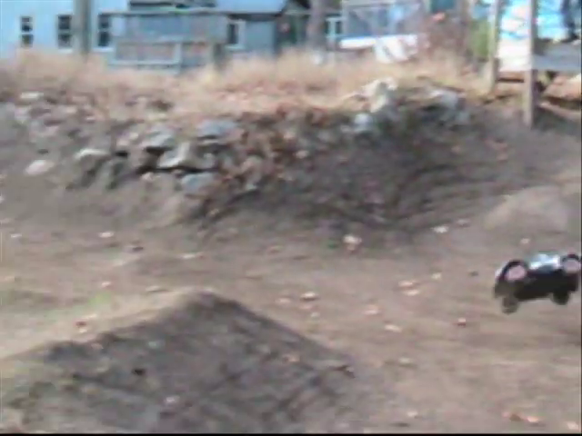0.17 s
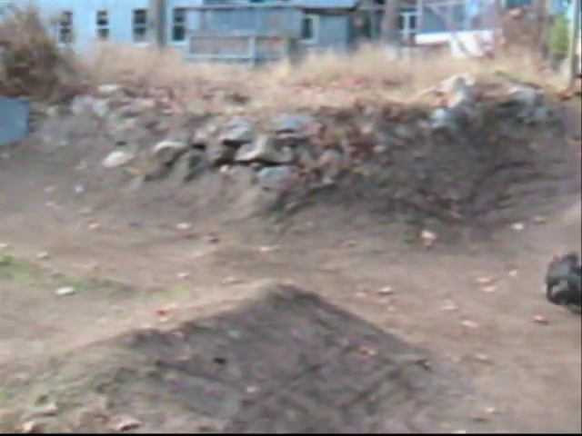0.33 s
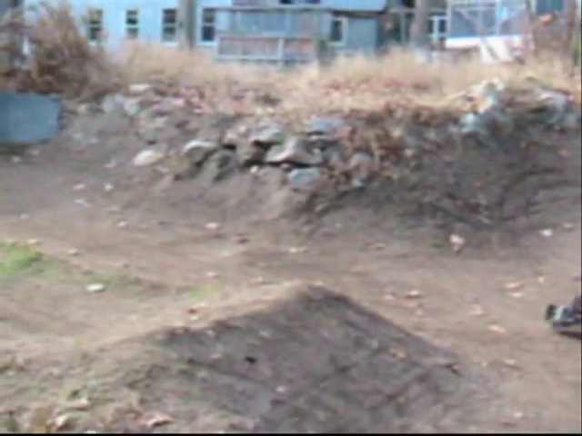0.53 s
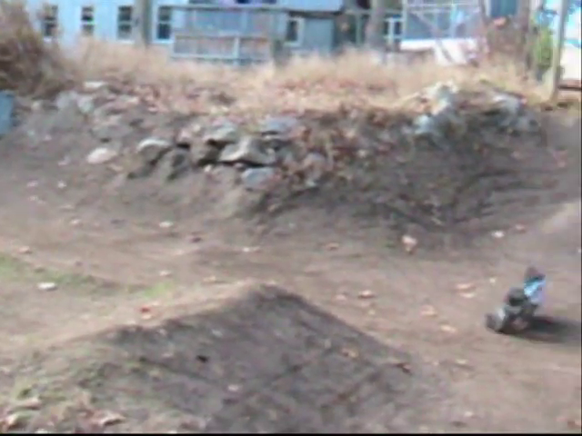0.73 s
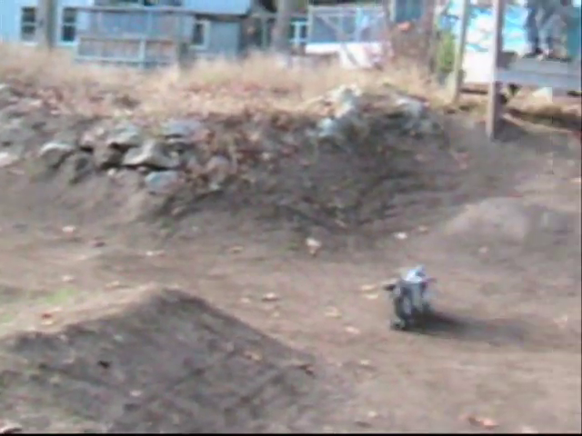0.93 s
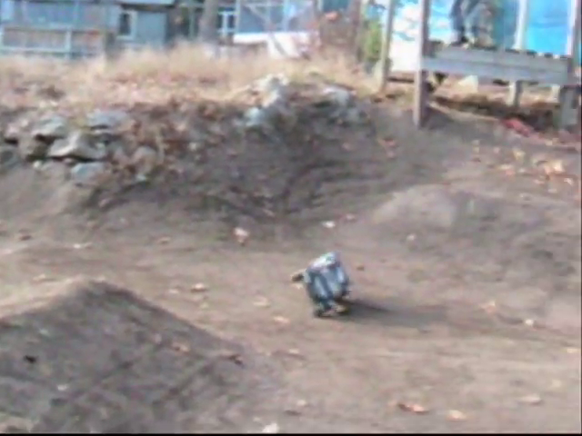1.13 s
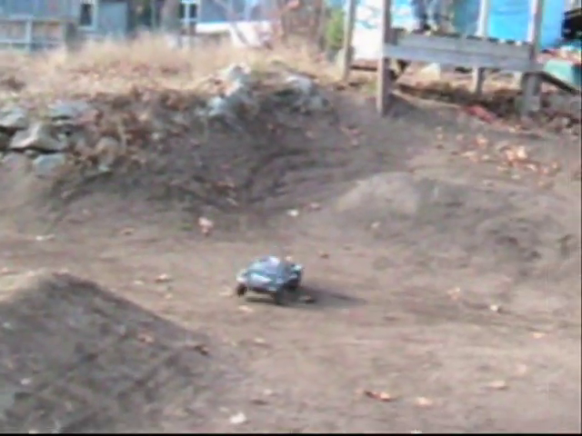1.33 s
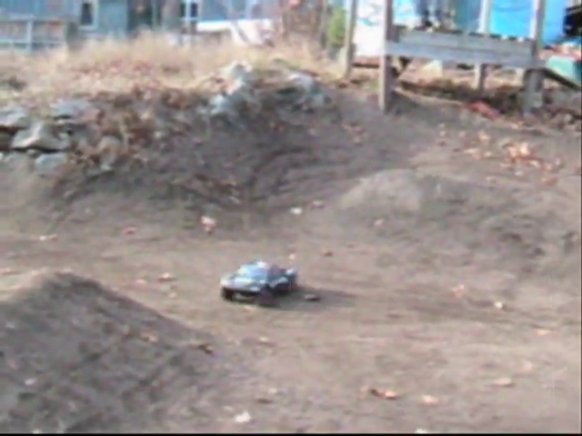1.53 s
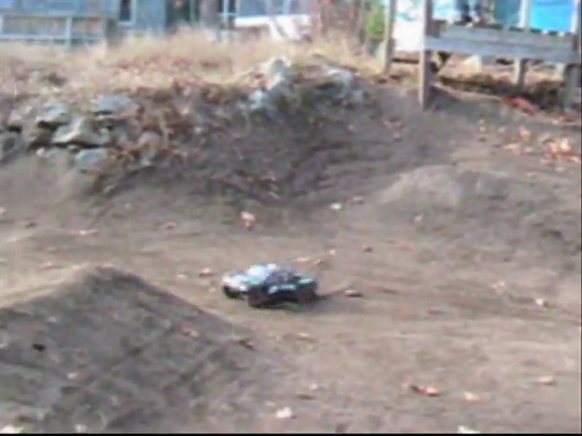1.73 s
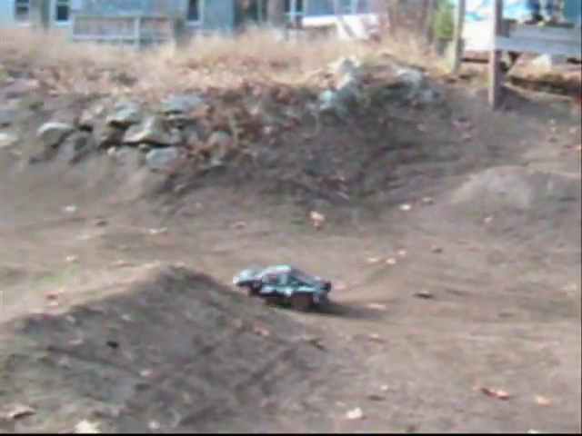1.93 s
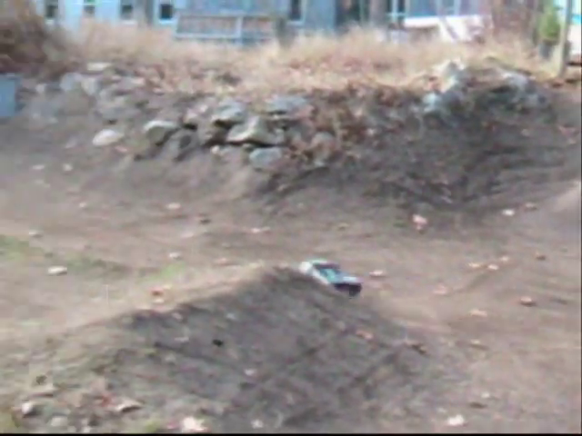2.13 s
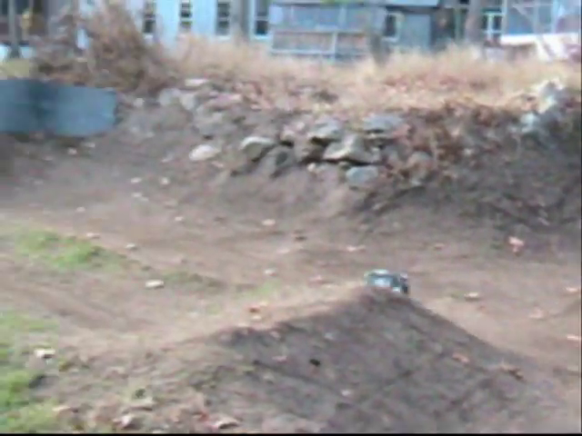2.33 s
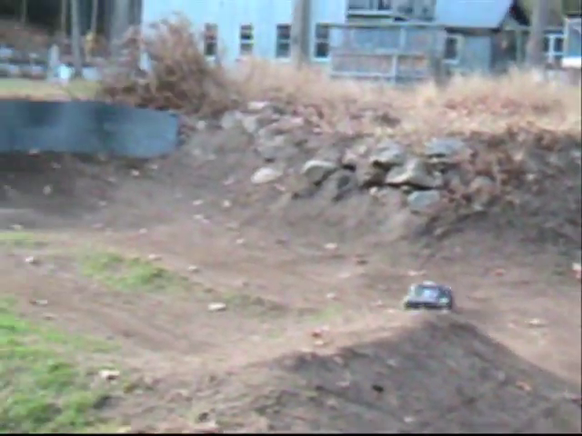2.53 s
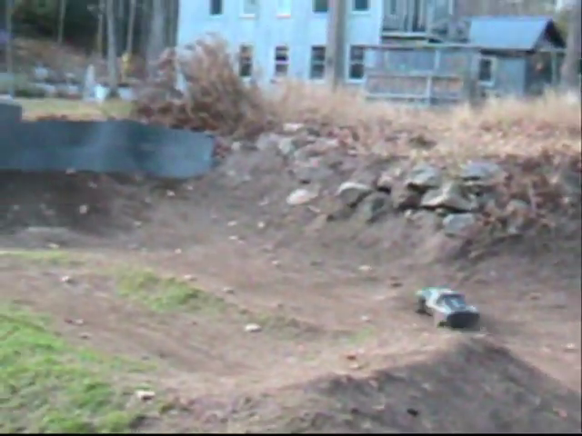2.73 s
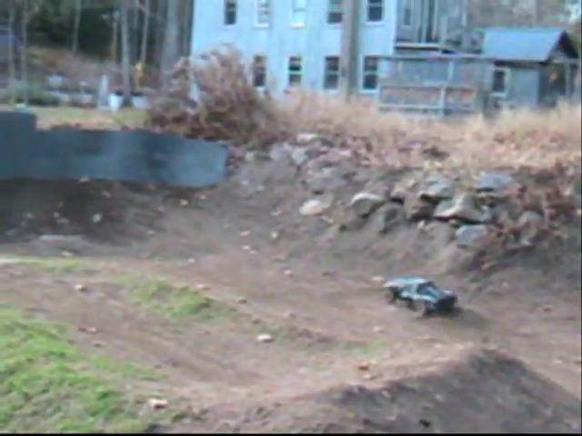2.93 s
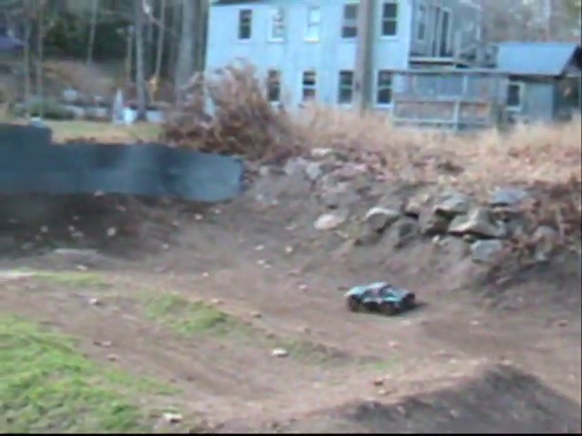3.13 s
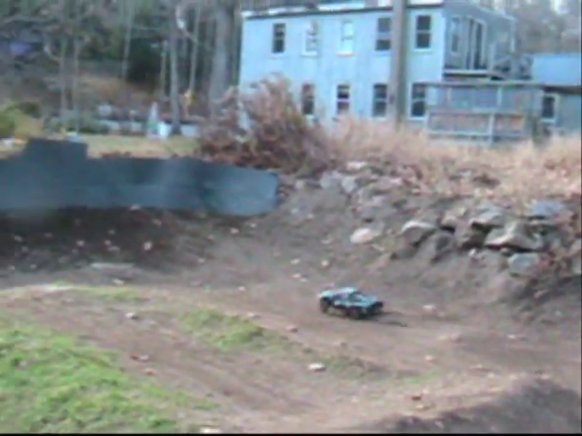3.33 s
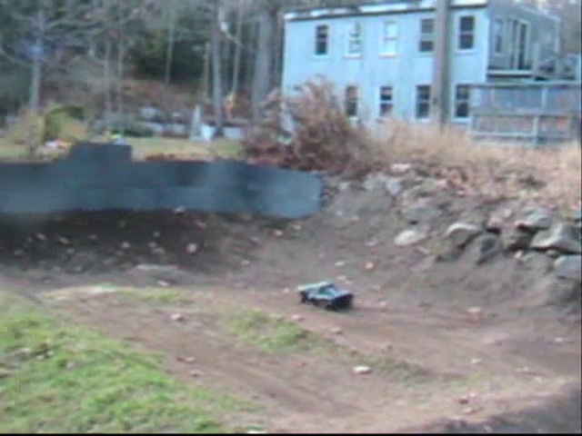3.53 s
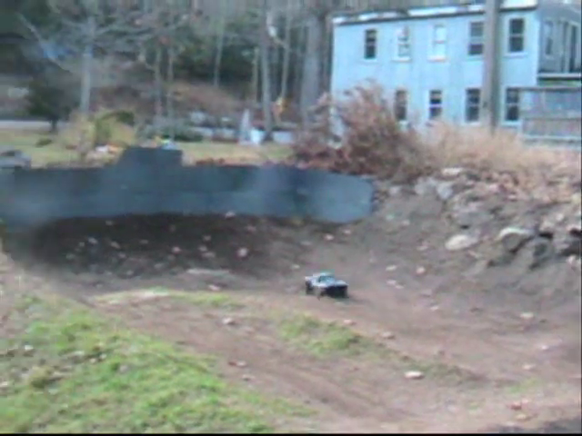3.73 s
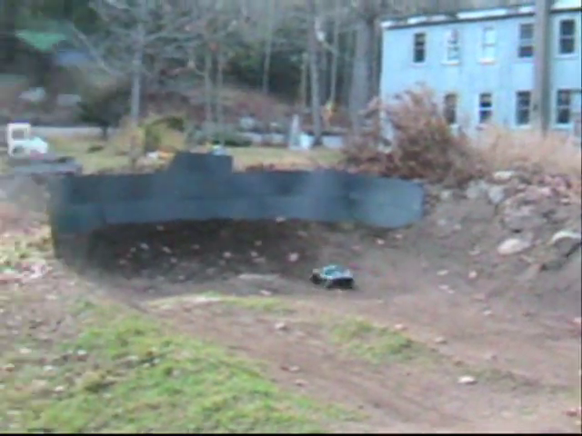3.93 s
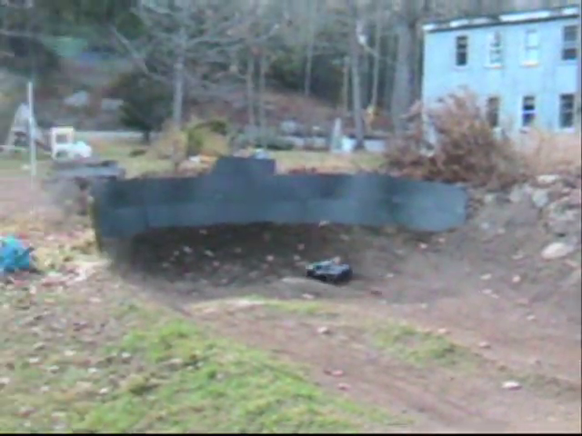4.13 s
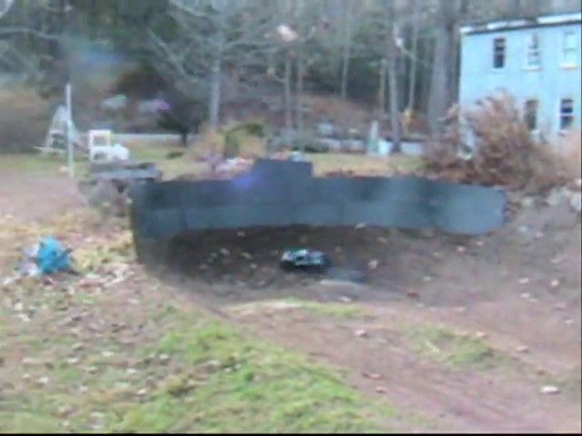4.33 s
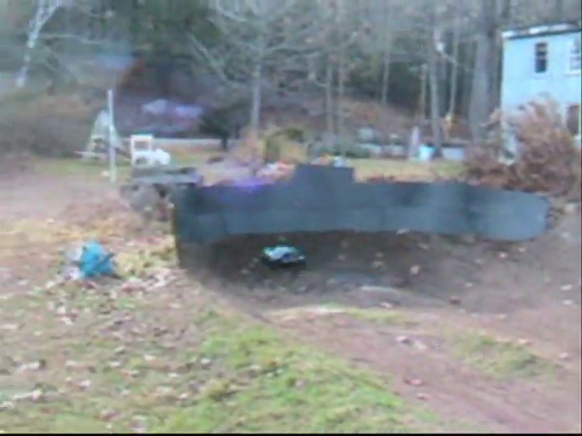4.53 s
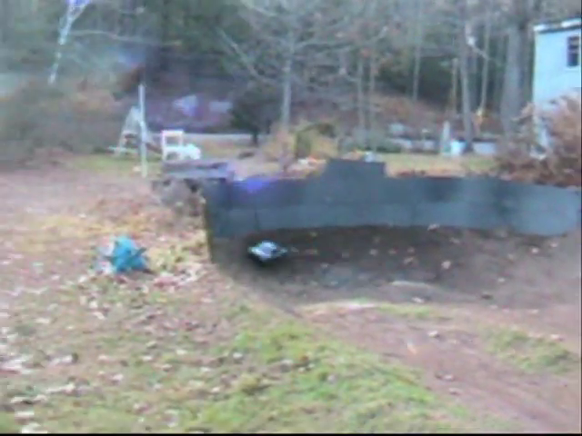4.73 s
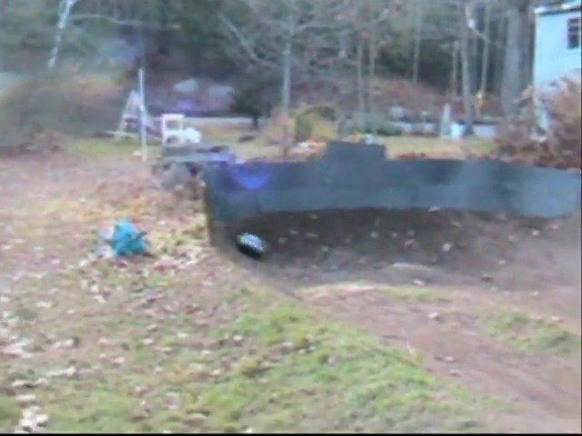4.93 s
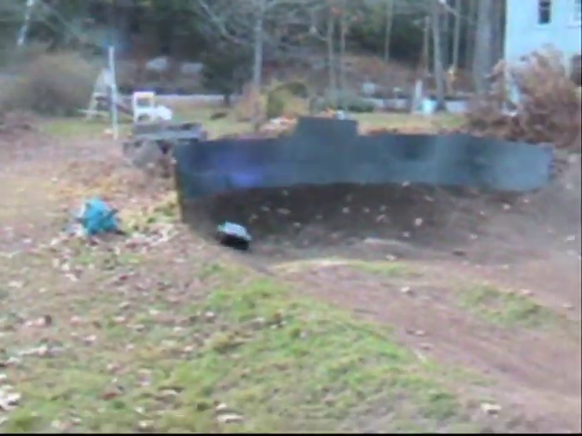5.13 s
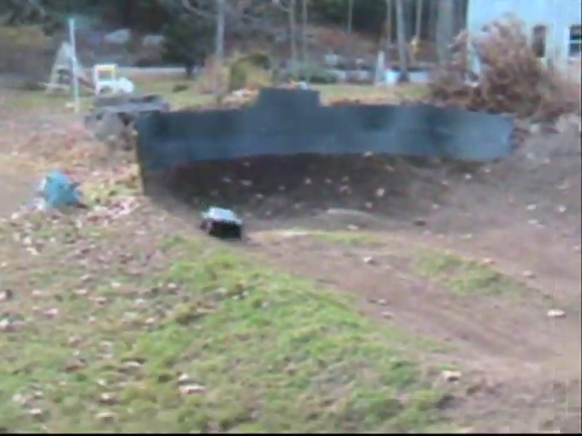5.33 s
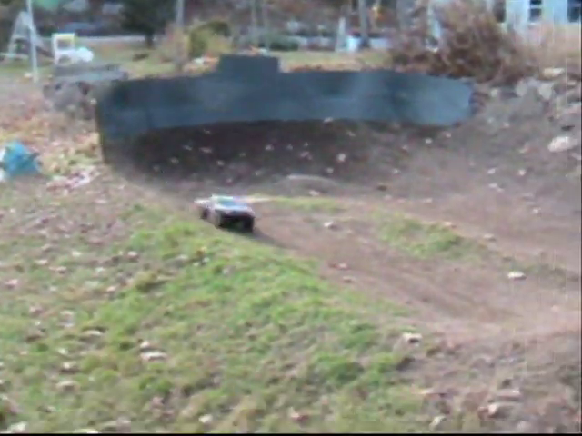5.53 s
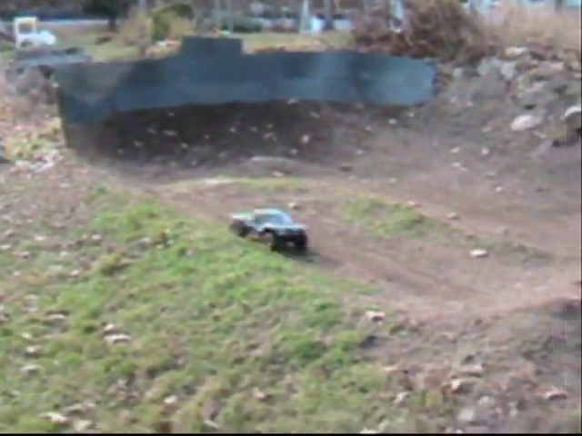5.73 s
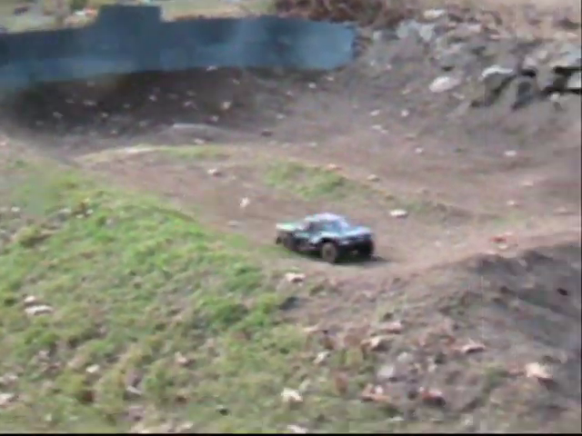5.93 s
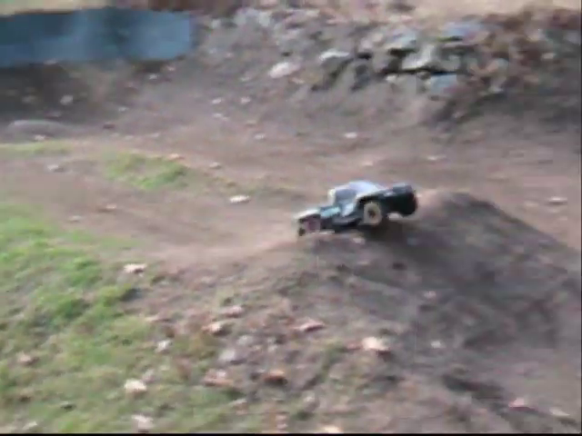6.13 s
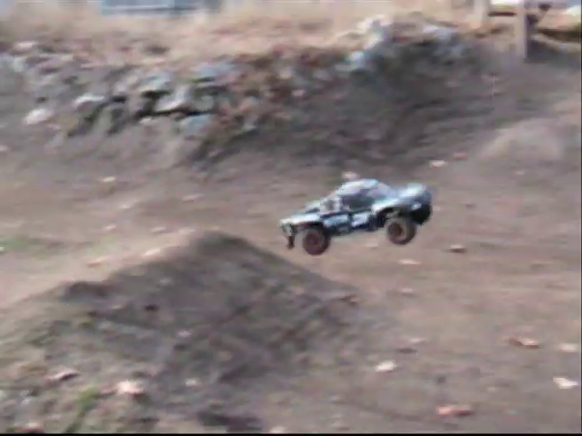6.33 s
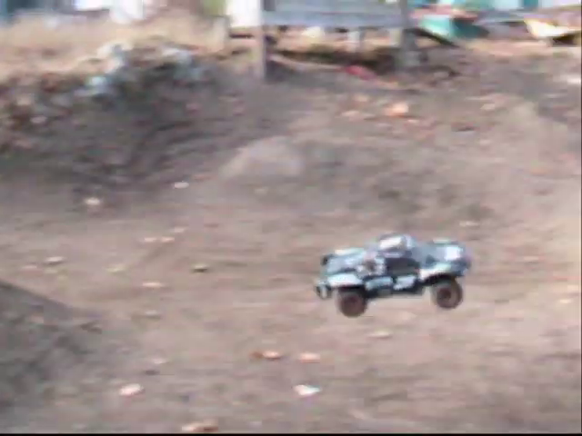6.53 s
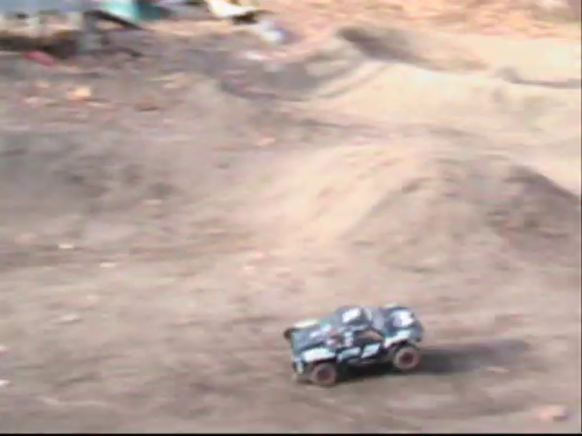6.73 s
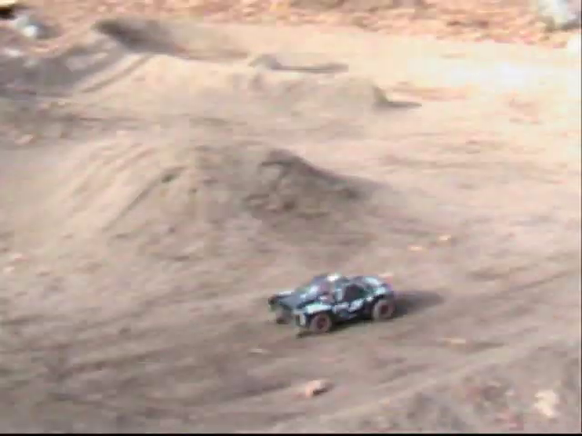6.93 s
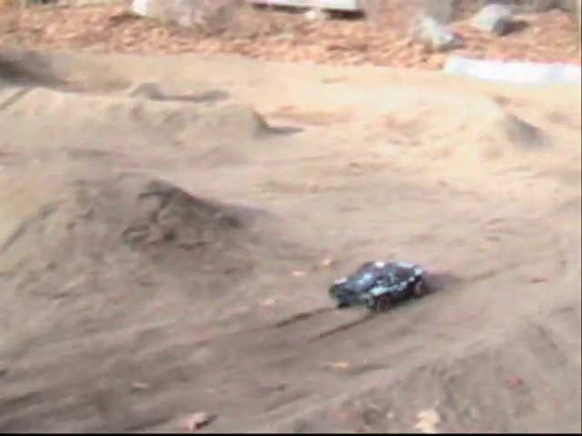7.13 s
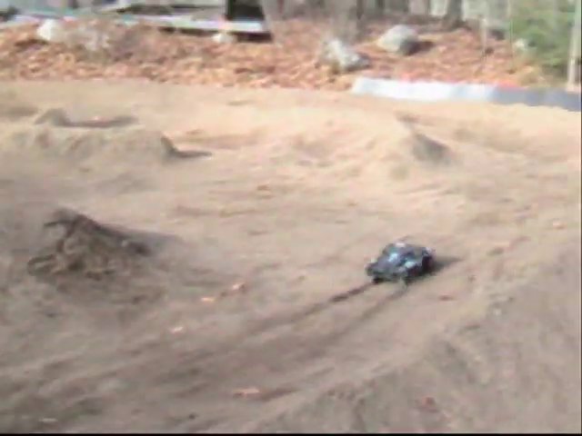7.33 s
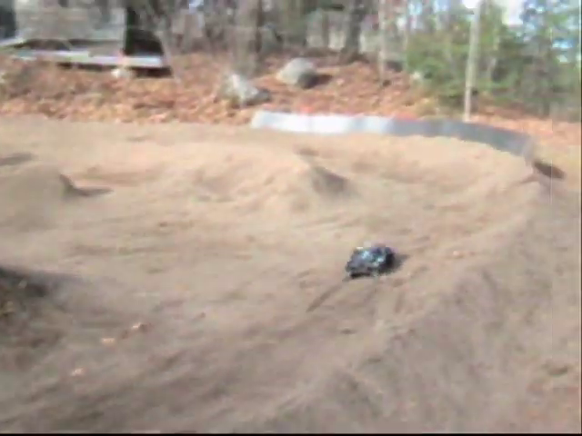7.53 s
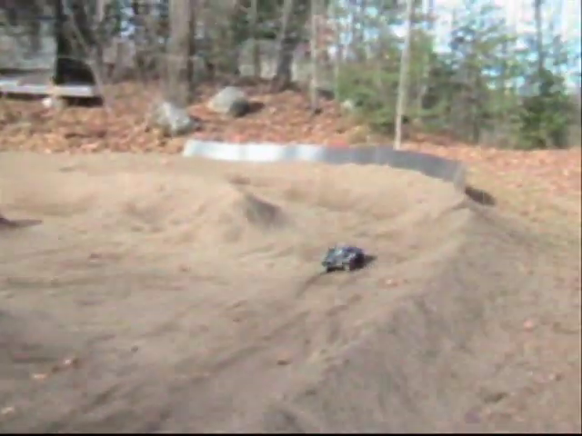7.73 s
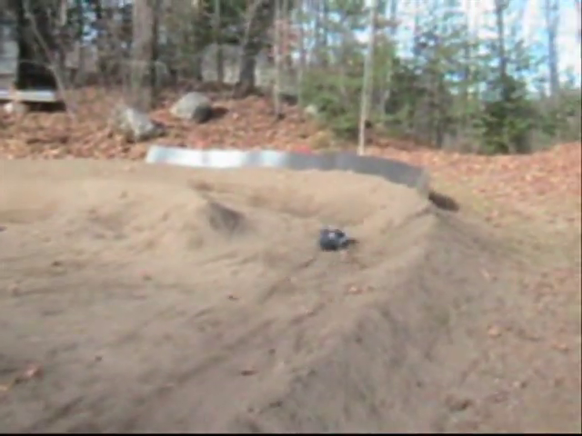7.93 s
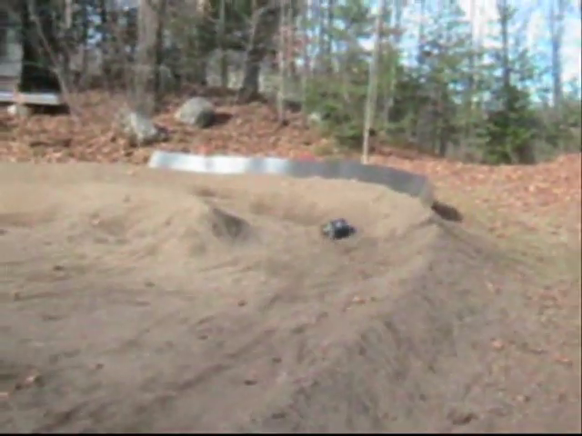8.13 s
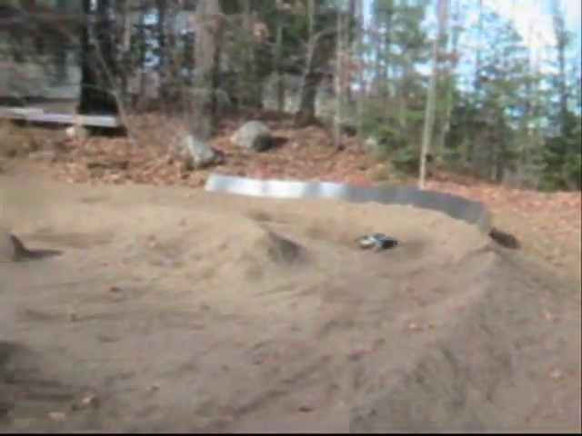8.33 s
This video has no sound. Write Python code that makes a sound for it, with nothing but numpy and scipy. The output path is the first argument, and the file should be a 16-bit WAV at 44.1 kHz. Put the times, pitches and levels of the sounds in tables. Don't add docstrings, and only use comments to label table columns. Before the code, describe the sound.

Hard knocks of a hollow plastic shell come first, clustered and irregular, with dull faint echoes from dirt banks. Then a tiny electric truck drives: thin, high, stuttering gear whine, lower gear hum, tyres scuffing dirt, grit pelting and loose parts rattling over bumps. A quieter moment of flight ends in a double plastic slam, and the whine fades slightly away. Faint open air behind, rough small-camera sound.

```python
import sys
import numpy as np
from scipy import signal
from scipy.fft import rfft, irfft, next_fast_len
from scipy.io import wavfile
from scipy.ndimage import uniform_filter1d

SR = 44100
rng = np.random.default_rng(int(sys.argv[2]) if len(sys.argv) > 2 else 0)


def natural_amplitude(level_db):
    exponent = np.asarray(level_db, float) / 20
    return 10 ** exponent


def master_out(mix):
    frames = np.transpose(np.atleast_2d(mix))
    ceiling = np.clip(frames, -1, 1)
    pcm = np.round(ceiling * 32767).astype(np.int16)
    wavfile.write(sys.argv[1], SR, pcm)


N = 369116

# (frequency [Hz], level [dB per Hz])
AIR_SPECTRUM = [(35, -53), (60, -17), (271, -4), (332, -2.5), (383, -6.5), (564, -11), (938, -72),
                (1040, -30), (7800, -41.5), (10100, -87), (17200, -120)]
AIR_DB = -43
# (time [s], level [dB])
BREEZE = [
    (0.0, -67),
    (4.59, -67.5),
    (8.37, -54),
]

# (time [s], tyre load [dB], wheel spin [dB])
ROLL = [(0, -39.5, -4), (0.4, -42.5, 1.5), (1.15, -43, -9), (1.41, -47.5, -15), (1.436, -30, -4),
        (1.56, -35, 8.5), (1.748, -30, 3.5), (2.49, -33.5, -6), (3.051, -34.5, 1), (3.799, -36.5, -1.5),
        (4.3, -28, -4), (4.6, -27.5, -1.5), (5.0, -37.5, -6.5), (5.502, -36, -3), (6.2, -27.5, 4),
        (6.98, -29, 3), (7.4, -33.5, 1), (8.37, -35, -6)]
# (frequency [Hz], level [dB per Hz])
TYRE_SPECTRUM = [(35, -53), (60, -62), (92, -7.5), (167, -6.5), (260, -0.5), (374, -9), (600, 0.5),
                 (784, -3), (1340, -2), (1900, -11), (2600, -19), (3380, -43), (5720, -120)]
# (frequency [Hz], level [dB per Hz])
GRIT_SPECTRUM = [(880, -29), (1500, -14), (2380, 2), (2570, -11), (2910, -4), (4080, -7), (7800, -22),
                 (10100, -20.5), (17200, -120)]
# (start [s], end [s], drop [dB])
LIFTS = [
    (2.504, 2.737, -8.5),
    (2.734, 2.853, -4.5),
    (3.19, 3.287, -4.5),
    (3.557, 3.677, -2),
    (3.99, 4.084, -5.5),
    (4.715, 4.757, -4.5),
    (6.3, 6.802, -8.5),
]
# (start [s], end [s], gain [dB])
SINGING = [
    (0, 1.4, -6),
    (3.66, 3.98, 6),
    (4.85, 5.2, 3),
    (5.25, 5.6, 3),
    (7.33, 8.02, 12),
]
MEAN_LOAD_DB = -37
GRIT_DB, GRIT_LOAD_SHARE, GRIT_SPIN_SHARE = -44.5, 0.7, 0.66
RING_DB, RING_LOAD_SHARE, RING_SPIN_SHARE = -44, 0.17, 0.68
GEARBOX_HZ, GEARBOX_WIDTH_HZ = 1390, 100
RING_PEAK_MESH_HZ, RING_SPAN_HZ, RING_PEAK_DB = 4050, 704, 0
HOP_S, HOP_SHARE = .012, .25

# (time [s], peak [dB], crack relative to it [dB])
BANGS = [(0.092, -11, -11), (0.098, 5.5, -10), (0.121, -7, -7.5), (0.135, -12.5, -9), (0.147, -9, -12),
         (0.183, -13.5, -5), (0.217, -14.5, -10), (0.161, -10.5, -7.5), (0.245, -22, -13), (0.271, -28, -7),
         (0.31, -19.5, -16), (0.339, -18, -14), (0.402, -9.5, 0), (0.407, -5, -22), (0.45, -1, -11.5),
         (0.429, -24, -20), (0.47, -15, -8), (0.488, -12.5, -11.5), (0.508, -3.5, -11.5), (0.521, -5, -6),
         (0.526, -11, -4), (0.544, -12.5, -30), (0.56, -25, -12), (0.574, -25, -6), (0.591, -12.5, -10),
         (0.763, -17, -7.5), (0.803, -23, -5.5), (0.841, -2, -9.5), (0.867, -6.5, -24), (0.887, -17.5, -3),
         (1.018, -11.5, -12.5), (1.035, -16, -9), (1.1, -29, -12), (1.419, -24.5, -6.5), (1.439, -16, -12),
         (6.806, -15, -11), (6.821, -3.5, -6), (6.835, 1.5, -6), (6.851, -11, -22), (6.866, -7, -6),
         (6.882, 0.5, -28), (6.91, -19, -6), (6.941, -14, -9)]
# (time [s], peak [dB])
SLAPS = [(0.097, -0.5), (0.1052, -10), (.4105, -7), (.4555, -11.5), (0.5255, -8.5), (0.5306, -14),
         (.544, -13.5), (6.839, -12), (6.888, -11.5), (1.708, -24), (1.826, -26), (1.978, -21.5),
         (2.05, -29), (2.195, -24)]
# (frequency [Hz], width [Hz], level [dB])
SHELL_MODES = [(238, 101, -2), (514, 68, 4), (561, 154, 4.5), (690, 115, 4.5), (937, 305, 2),
               (1140, 800, 4), (1540, 620, -3), (3030, 100, -45)]
# (frequency [Hz], level [dB per Hz])
CRACK_SPECTRUM = [(880, -9.5), (1500, 4.5), (2950, -3), (3780, -7), (5520, -14.5), (6790, -20.5),
                  (7800, -18), (10100, -57), (17200, -120)]
SLAP_S, SLAP_DB = 0.00053, 8.5
SNAP_HZ, SNAP_WIDTH_HZ, SNAP_DB, SNAP_T60_S = 2930, 270, -19, 0.013
# (time [s], pitch [Hz], peak [dB])
TWANGS = [
    (.122, 3150, -22),
    (.217, 1650, -18),
    (.343, 3750, -31),
    (0.845, 2930, -24),
    (6.922, 3100, -30),
]
TWANG_T60_S = 0.034
# (delay [s], level [dB])
ECHOES = [
    (0.02, -18.5),
    (0.046, -18),
    (.083, -25.5),
    (0.131, -29.5),
]

# (time [s], peak [dB])
TICKS = [(.529, -14), (6.513, -35), (4.245, -34), (4.606, -36), (7.368, -33), (3.33, -44), (3.359, -44),
         (2.755, -44), (4.192, -31), (4.338, -30), (4.427, -18), (5.797, -20.5), (6.003, -40), (6.058, -43),
         (6.116, -35), (6.128, -23), (6.24, -20), (7.505, -33), (7.617, -35), (7.975, -34), (8.049, -25),
         (8.157, -27), (8.325, -29)]
# (time [s], peak [dB])
RATTLES = [(1.705, -19), (1.87, -31), (1.904, -12.5), (1.982, -25), (2.188, -24), (2.992, -21),
           (3.144, -17), (3.236, -17.5), (3.331, -20), (3.359, -16), (4.082, -19), (4.191, -18),
           (4.246, -28), (4.311, -17), (4.34, -12), (4.434, -18), (4.557, -29), (4.605, -38), (4.653, -14),
           (5.231, -21), (5.327, -17), (5.516, -24), (5.797, -35), (5.988, -25), (6.059, -7), (6.115, -6.5),
           (6.127, -7.5), (6.237, -10), (6.509, -23), (6.791, -15), (8.049, -24), (8.099, -19)]
# (time [s], peak [dB], length [s])
KNOCKS = [(4.769, -21, 0.012), (4.86, -28, 0.013), (4.888, -28, .025), (6.186, -20, 0.014),
          (6.284, -23.5, .022), (6.335, -20, 0.018), (6.388, -22, 0.014), (6.476, -25, .032),
          (6.549, -25.5, 0.0082), (6.707, -21.5, 0.0068), (6.594, -31, .035), (7.434, -17, 0.013)]
TICK_T60_S, RATTLE_NOTE_S = .012, .018
RATTLE_RING_DB, KNOCK_RING_DB = -16.5, -5.5

# (time [s], gear mesh [Hz], steady mesh level [dB])
BURSTS = [
    [(1.472, 1100, -33), (1.506, 1520, -33), (1.515, 1900, -52), (1.525, 2250, -44), (1.54, 2650, -42),
     (1.58, 2880, -41), (1.6, 3150, -47), (1.615, 3300, -56)],
    [(1.616, 3600, -56), (1.64, 3600, -47), (1.665, 3600, -52), (1.677, 3620, -41), (1.7, 3600, -47),
     (1.745, 3500, -44), (1.765, 3900, -48), (1.96, 3900, -53), (2.15, 4350, -60), (2.25, 4750, -55)],
    [(2.71, 1650, -52), (2.75, 1950, -60), (2.785, 2550, -49), (2.803, 2500, -57), (2.818, 2620, -45),
     (2.855, 3020, -44), (2.885, 2950, -44), (2.9, 3150, -50), (3.07, 3800, -56)],
    [(3.258, 2700, -50), (3.272, 2520, -46), (3.282, 2750, -58), (3.293, 2950, -41), (3.317, 2830, -40),
     (3.36, 3550, -56), (3.38, 3720, -45), (3.46, 3420, -55), (3.52, 3350, -62)],
    [(3.58, 2700, -54), (3.605, 2750, -50), (3.635, 3300, -62), (3.648, 3400, -47), (3.66, 3050, -41),
     (3.692, 3180, -44), (3.7, 3350, -56), (3.725, 3480, -51)],
    [(3.73, 3550, -57), (3.768, 4270, -50), (3.79, 3900, -58), (3.85, 4300, -62), (3.945, 4050, -56),
     (3.962, 3970, -47), (3.988, 3900, -48), (4.012, 3350, -52)],
]
# (time [s], gear mesh [Hz], steady mesh level [dB])
LONG_PULLS = [
    [(4.488, 3960, -43), (4.515, 4050, -54), (4.68, 3520, -58), (4.78, 4450, -59), (4.93, 3750, -66),
     (4.945, 3750, -50), (4.99, 3680, -49), (5.01, 3250, -58)],
    [(5.015, 3250, -58), (5.1, 3480, -57), (5.14, 3500, -59), (5.18, 4400, -62), (5.58, 4900, -60),
     (6.26, 4700, -58)],
    [(6.995, 3480, -48), (7.21, 4360, -48), (7.32, 4380, -47), (7.36, 4550, -58), (7.7, 4680, -59),
     (8.37, 4350, -63)],
]
# (time [s], length [s], start pitch [Hz], level [dB])
GRIPS_FIRM = [(1.808, .042, 4100, -44), (1.868, .016, 4200, -41), (1.902, .026, 4120, -41),
              (2.005, .045, 4480, -50), (2.056, .025, 4180, -51), (2.096, .016, 4080, -49),
              (2.284, .035, 4850, -55), (2.338, .04, 4750, -55), (2.912, .045, 3600, -45),
              (3.005, .022, 3820, -45), (3.035, .027, 4020, -47), (3.322, .02, 3330, -47),
              (3.395, .014, 4070, -46), (3.444, .022, 3540, -40), (3.812, .018, 4720, -56),
              (3.89, .034, 4560, -52), (4.22, .021, 4720, -50), (4.474, .014, 4150, -43),
              (4.559, .018, 4350, -48), (4.789, .038, 4870, -53), (8.234, .018, 4150, -52),
              (8.278, .042, 5000, -50), (8.324, .022, 4500, -48)]
# (time [s], length [s], start pitch [Hz], level [dB])
GRIPS_LOOSE = [(3.41, .024, 3850, -45), (4.83, .022, 4480, -50), (4.88, .018, 4200, -51),
               (5.19, .058, 4850, -54), (5.262, .02, 4400, -57), (5.298, .022, 4880, -52),
               (5.325, .015, 3900, -55), (5.4, .03, 5000, -51), (5.448, .032, 4850, -49),
               (5.612, .032, 4800, -52), (5.768, .018, 4800, -52), (5.85, .02, 4800, -54),
               (5.896, .048, 5120, -50), (6.017, .02, 5050, -48), (5.985, .018, 4950, -52),
               (6.19, .015, 4900, -43), (6.222, .016, 5000, -47), (6.146, .012, 4800, -49),
               (7.387, .028, 4750, -46), (7.855, .018, 4750, -52), (7.92, .02, 4950, -55),
               (7.978, .02, 4700, -48), (8.122, .022, 4650, -51)]
# (time [s], length [s], start pitch [Hz], level [dB])
GRIPS_STALL = [
    (3.522, .026, 3950, -48),
    (5.726, .024, 5050, -53),
    (6.238, .014, 4750, -44),
]
# (first [s], spacing [s], bites [count], start [Hz], climb [Hz a bite], level [dB])
RIPPLES = [
    (7.028, .039, 4, 4100, 70, -44),
    (7.186, .095, 2, 4600, -70, -46),
    (7.525, .047, 4, 4680, 0, -47),
    (7.73, .03, 2, 4680, -60, -53),
]
RIPPLE_BITE_S = .022
SAG_HZ_PER_S, LOOSE_SAG_HZ_PER_S, STALL_SAG_HZ_PER_S = 12000, 22000, 44000
UNLOADED_S = .018
TEETH_PER_WHEEL_TURN, LOADED_SHARE, WOBBLE_HZ = 150, .68, 260
HARD_PULL_DB, SLACK_DB = -47, -52
DRIVE_DB = 3
CAN_RATIO = 2.33
# (start [s], end [s], start pitch [Hz], end pitch [Hz], level [dB])
STRANDS = [(1.538, 1.62, 3620, 3500, -47), (1.675, 1.7, 4250, 4180, -50), (1.72, 1.752, 4250, 4050, -47),
           (1.884, 1.904, 3980, 4100, -43), (1.94, 1.958, 3850, 3800, -48), (1.965, 2.0, 4080, 4420, -49),
           (3.328, 3.36, 3800, 3500, -51), (3.43, 3.468, 2850, 2750, -52), (3.484, 3.508, 4200, 4000, -52),
           (4.75, 4.77, 4250, 4500, -53), (5.155, 5.176, 4150, 4270, -54), (5.575, 5.6, 5080, 4650, -53),
           (5.658, 5.674, 4920, 4800, -52), (6.286, 6.3, 5250, 5050, -48), (2.7, 2.728, 1600, 1700, -47),
           (2.755, 2.775, 2100, 2350, -50), (2.78, 2.8, 3000, 3000, -52), (2.965, 2.988, 3450, 3550, -47),
           (3.088, 3.098, 3650, 3550, -50), (3.375, 3.405, 3650, 4050, -47), (4.195, 4.21, 4000, 4050, -46),
           (4.6, 4.62, 4700, 4850, -50), (4.63, 4.645, 4350, 4450, -49), (4.66, 4.682, 3700, 3450, -50),
           (4.714, 4.742, 3900, 3800, -50), (7.362, 7.372, 4400, 4200, -47), (8.14, 8.16, 3900, 3450, -52),
           (4.035, 4.055, 4400, 4300, -54), (4.525, 4.54, 4400, 4250, -48), (8.352, 8.37, 4300, 4450, -49),
           (7.42, 7.44, 4350, 4650, -51), (7.49, 7.508, 4900, 4750, -52), (7.7, 7.725, 4700, 4850, -54)]
# (start [s], end [s], start pitch [Hz], end pitch [Hz], level [dB])
PULLS = [(1.587, 1.69, 880, 900, -44), (1.747, 1.81, 880, 958, -41), (1.863, 1.956, 960, 861, -35.5),
         (1.964, 2.093, 985, 960, -36.5), (2.239, 2.362, 1105, 1073, -39), (2.968, 3.102, 800, 880, -39),
         (3.335, 3.555, 880, 777, -42), (5.377, 5.51, 1120, 1140, -44), (5.532, 5.619, 1170, 1147, -43),
         (5.645, 5.79, 1180, 1120, -43), (5.845, 6.253, 1140, 1120, -41.5), (7.016, 7.182, 890, 953, -36),
         (7.247, 7.332, 1080, 1110, -44), (7.334, 7.413, 1120, 1110, -33), (7.45, 7.55, 1120, 1048, -41),
         (7.644, 7.79, 1070, 1093, -39), (7.82, 7.871, 1110, 1089, -38.5), (7.919, 8.021, 1100, 1080, -46)]
SECOND_STAGE_RATIO = 4.2
SHAFT_SHARE, SHAFT_DB = 2 / 3, -7
# (time [s], pitch [Hz], level [dB])
PINGS = [
    (4.49, 2650, -42),
    (4.556, 2600, -46),
    (4.658, 2620, -41),
    (4.696, 2600, -47),
    (4.958, 2700, -45),
    (4.994, 2750, -50),
    (5.026, 2680, -46),
    (5.06, 2720, -49),
    (5.094, 2700, -48),
    (5.123, 2820, -49),
]
PING_S, PING_OCTAVE_DB = .013, -14
HOLD_HZ = 16003.6


def rms_one(x):
    return x / np.sqrt(np.mean(x ** 2) + 1e-20)


def in_time(s, values):
    return np.interp(np.arange(N) / SR, s, values)


def drift(rate_hz):
    r = np.exp(-40 * np.pi * rate_hz / SR)
    slow = signal.lfilter([1], [1, -2 * r, r * r], rng.standard_normal(N // 20 + 2002))[2000:]
    return np.interp(np.arange(N) / 20, np.arange(len(slow)), rms_one(slow))


def tone(hz):
    return np.sqrt(2) * np.sin(2 * np.pi * np.cumsum(hz) / SR)


def glide(starts, ends, from_hz, to_hz):
    return in_time(np.ravel([starts, ends], "F"), np.ravel([from_hz, to_hz], "F"))


def held(starts, ends, levels_db, size):
    out = np.zeros(N)
    for a, b, gain in zip(starts, ends, natural_amplitude(levels_db)):
        out[int(a * SR):int(b * SR)] = gain
    return uniform_filter1d(out, size=size)


def blows(times, levels_db, t60s, rise_s):
    out = np.full(N, 1e-9)
    for s, level_db, t60 in zip(times, levels_db, t60s):
        start = int(s * SR)
        t = np.arange(min(int(t60 * SR), N - start)) / SR
        out[start:start + len(t)] += (1 - np.exp(-t / rise_s)) * natural_amplitude(level_db - 60 * t / t60)
    return out


def resonance(x, hz, width_hz):
    r = np.exp(-np.pi * width_hz / SR)
    zeros = np.array([1, 0, -1]) * (1 - r * r) / 2
    return signal.lfilter(zeros, [1, -2 * r * np.cos(2 * np.pi * hz / SR), r * r], x)


def grains(per_s, spread_db, smooth):
    sizes = natural_amplitude(spread_db * np.minimum(rng.exponential(1, (2, N)), 4)) * rng.choice([-1, 1], (2, N))
    clicks = rms_one(sizes * (rng.random((2, N)) < per_s / SR))
    return rms_one(clicks + smooth * rng.standard_normal((2, N)))


def coloured(source, spectrum, patchy_db, rate_hz):
    hz, level_db = np.transpose(spectrum)
    edges = hz[0] * 2 ** np.arange(0, np.log2(hz[-1] / hz[0]) + 1 / 3, 1 / 3)
    out, together = 0., drift(rate_hz)
    for k, (low, high) in enumerate(zip(edges, edges[1:])):
        centre_db = np.interp(np.log(low * high) / 2, np.log(hz), level_db)
        if centre_db < -58:
            continue
        band = signal.sosfilt(signal.butter(2, [low, high], "band", fs=SR, output="sos"), source[k % 2])
        out = out + band * natural_amplitude(centre_db + patchy_db * (together + 1.42 * drift(rate_hz)))
    return rms_one(out)


def outdoor_air():
    noise = rng.standard_normal((2, N))
    return natural_amplitude(AIR_DB + 1.5) * coloured(noise, AIR_SPECTRUM, patchy_db=-1.0, rate_hz=8.7)


def breeze():
    low = signal.sosfilt(signal.butter(2, [34, 65], "band", fs=SR, output="sos"), rng.standard_normal(N))
    return rms_one(low) * natural_amplitude(in_time(*np.transpose(BREEZE)) + 2.1 * drift(5.4))


def mean_mesh():
    return in_time(*np.concatenate(BURSTS + LONG_PULLS).T[:2])


def rolling():
    s, load_db, spin_db = np.transpose(ROLL)
    lift_db = sum(db * held([a], [b], [0], size=1200) for a, b, db in LIFTS)
    tyre_db = in_time(s, load_db) + lift_db
    spin_db = in_time(s, spin_db) + 0.28 * lift_db
    ring_db = RING_DB + RING_LOAD_SHARE * (tyre_db - MEAN_LOAD_DB) + RING_SPIN_SHARE * spin_db
    ring_db += RING_PEAK_DB * np.exp(-((mean_mesh() - RING_PEAK_MESH_HZ) / RING_SPAN_HZ) ** 2)
    ring_db += sum(db * held([a], [b], [0], size=2500) for a, b, db in SINGING)
    grit_db = GRIT_DB + GRIT_LOAD_SHARE * (tyre_db - MEAN_LOAD_DB) + GRIT_SPIN_SHARE * spin_db

    bump_s = np.array([row[0] for row in RATTLES + KNOCKS])
    hops = 1 - HOP_SHARE * held(bump_s - HOP_S, bump_s, np.zeros(len(bump_s)), size=100)
    bumps = drift(40)

    tyres = coloured(grains(1500, spread_db=4.0, smooth=1.14), TYRE_SPECTRUM, patchy_db=1.44, rate_hz=13.0)
    case = resonance(rng.standard_normal(N), GEARBOX_HZ, 310)
    ring = rms_one(resonance(case, GEARBOX_HZ, GEARBOX_WIDTH_HZ))
    grit = coloured(grains(350, spread_db=3.8, smooth=1.5), GRIT_SPECTRUM, patchy_db=.9, rate_hz=40)

    tyres = tyres * natural_amplitude(tyre_db + 1.5 + 0.58 * bumps)
    ring = ring * natural_amplitude(ring_db + 1.14 * drift(45))
    grit = grit * natural_amplitude(grit_db + 1.1 * bumps)
    return hops * (tyres + ring + grit)


def bangs():
    s, peak_db, crack_db = np.transpose(BANGS)
    t60s = np.clip(0.15 + 0.00032 * peak_db, .02, .6)
    source = grains(2000, spread_db=4.0, smooth=0.89)

    contacts = source[0] * blows(s, peak_db, t60s, rise_s=0.0037)
    contacts += 2.55 * blows(s, peak_db, t60s * 0.012, rise_s=0.00034)
    slap_s, slap_db = np.transpose(SLAPS)
    contacts += held(slap_s, slap_s + SLAP_S, slap_db + SLAP_DB, size=16)

    hollow = 0
    for k, (hz, width_hz, db) in enumerate(SHELL_MODES):
        hollow += resonance(contacts, hz, width_hz) * natural_amplitude(db) / np.sqrt(width_hz) * (-1) ** k
    hollow = signal.sosfilt(signal.butter(2, 85, "high", fs=SR, output="sos"), hollow)

    crack_db = peak_db + crack_db
    shape = blows(s, crack_db - 10.5, t60s * 1.12, rise_s=0.0021)
    shape += blows(s, crack_db - 3.5, t60s * 0.34, rise_s=0.002)
    crack = coloured(source, CRACK_SPECTRUM, patchy_db=1.0, rate_hz=34.5) * shape
    snap_shape = blows(s, crack_db + SNAP_DB, np.full(len(s), SNAP_T60_S), rise_s=0.00048)
    snap = resonance(source[1] * snap_shape, SNAP_HZ, SNAP_WIDTH_HZ)
    return snap + hollow * natural_amplitude(27.5) + crack


def twangs():
    s, hz, peak_db = np.transpose(TWANGS)
    pitch_hz = in_time(s + TWANG_T60_S / 4, hz)
    return tone(pitch_hz) * blows(s, peak_db, np.full(len(s), TWANG_T60_S), rise_s=.002)


def rattles():
    s, peak_db, length = np.transpose([row + (RATTLE_NOTE_S,) for row in RATTLES] + KNOCKS)
    ring_db = np.repeat([RATTLE_RING_DB, KNOCK_RING_DB], [len(RATTLES), len(KNOCKS)])
    t60s = rng.uniform(.035, .06, len(s))
    source = grains(5000, spread_db=-3.5, smooth=0.39)

    spectrum = TYRE_SPECTRUM[3:-2] + [(hz, db - 8.5) for hz, db in GRIT_SPECTRUM[1:]]
    scratch = coloured(source, spectrum, patchy_db=2.5, rate_hz=43)
    scratch = scratch * blows(s, peak_db - 7.5, t60s, rise_s=.002)

    note = tone(GEARBOX_HZ + 90 * drift(100)) * natural_amplitude(2.0 * drift(120))
    note = note * held(s + .001, s + length, peak_db + 1.3 * ring_db + 3, size=150)

    tick_s, tick_db = np.transpose(TICKS)
    ticks = coloured(source[::-1], GRIT_SPECTRUM, patchy_db=1.5, rate_hz=35)
    ticks = ticks * blows(tick_s, tick_db, np.full(len(TICKS), TICK_T60_S), rise_s=0.00037)
    return scratch + ticks + note * natural_amplitude(-0.5)


def track(x):
    dull, out = signal.lfilter([.3], [1, -.7], x), x.copy()
    for s, level_db in ECHOES:
        delay = int(s * SR)
        out[delay:] += natural_amplitude(level_db) * dull[:N - delay]
    return out


def gear_mesh():
    mesh_hz, load, t = mean_mesh(), np.zeros(N), np.arange(N) / SR
    for burst in BURSTS + LONG_PULLS:
        s, _, level_db = np.transpose(burst)
        on = (t > s[0]) * (t < s[-1])
        turn = np.cumsum(mesh_hz * on * natural_amplitude(2 * drift(8)) / TEETH_PER_WHEEL_TURN / SR) % 1
        level_db = in_time(s, level_db)
        slack = np.clip((HARD_PULL_DB - level_db) / (HARD_PULL_DB - SLACK_DB), .1, 1) * on
        load += natural_amplitude(level_db + 1 - 14 * slack * (turn > LOADED_SHARE)) * on
        mesh_hz += WOBBLE_HZ * (LOADED_SHARE / 2 - turn) * slack

    ripples = []
    for s, gap, count, hz, climb_hz, db in RIPPLES:
        ripples += [(s + k * gap, RIPPLE_BITE_S, hz + k * climb_hz, db) for k in range(count)]
    grounds = [(GRIPS_FIRM + ripples, SAG_HZ_PER_S), (GRIPS_LOOSE, LOOSE_SAG_HZ_PER_S),
               (GRIPS_STALL, STALL_SAG_HZ_PER_S)]
    unloaded = int(UNLOADED_S * SR)
    for bites, sag in grounds:
        for s, length, start_hz, level_db in bites:
            a, b = int(s * SR), int((s + length) * SR)
            mesh_hz[a:b] = start_hz - sag * (t[a:b] - s)
            load[a - unloaded:a] *= .2
            load[b:b + unloaded] *= .4
            load[a:b] = natural_amplitude(level_db + 1.5)
    return uniform_filter1d(mesh_hz, size=90), uniform_filter1d(load, size=260)


def drive():
    mesh_hz, load = gear_mesh()
    mesh_hz = mesh_hz + 55 * drift(200) + 35 * drift(30)
    flutter = uniform_filter1d(load, size=6000) * natural_amplitude(-17.0 + 5.0 * drift(37))
    mesh = load * natural_amplitude(2.6 * drift(120)) + flutter
    octave = resonance(mesh * tone(2 * mesh_hz), 7900, 900)
    motor_can = resonance(mesh * tone(CAN_RATIO * mesh_hz), 7000, 1100)
    whine = mesh * tone(mesh_hz) + natural_amplitude(-13) * octave + natural_amplitude(-19) * motor_can

    stage_hz = uniform_filter1d(mesh_hz, size=5000) / SECOND_STAGE_RATIO
    sides = tone(mesh_hz - stage_hz) * natural_amplitude(-13 + 3.7 * drift(30))
    sides += tone(mesh_hz * 1.15) * natural_amplitude(-8 + 3.5 * drift(12))
    return whine + flutter * sides + strands() + stage_hum() + pings()


def strands():
    a, b, from_hz, to_hz, level_db = np.transpose(sorted(STRANDS))
    hz = glide(a, b, from_hz, to_hz) + 60 * drift(150)
    return held(a, b, level_db, size=260) * natural_amplitude(2.5 * drift(100)) * tone(hz)


def stage_hum():
    a, b, from_hz, to_hz, level_db = np.transpose(PULLS)
    hz = glide(a, b, from_hz, to_hz) + 22 * drift(50)
    shaft = natural_amplitude(SHAFT_DB + 3.0 * drift(30)) * tone(SHAFT_SHARE * hz)
    octave = natural_amplitude(-15) * tone(2 * hz + 90 * drift(80))
    return held(a, b, level_db, size=700) * natural_amplitude(-.5 + 2.2 * drift(40)) * (tone(hz) + shaft + octave)


def pings():
    s, hz, level_db = np.transpose(PINGS)
    hz = in_time(s + PING_S / 2, hz) + 70 * drift(60)
    return held(s, s + PING_S, level_db, size=250) * (tone(hz) + natural_amplitude(PING_OCTAVE_DB) * tone(2 * hz))


def scene():
    bed = outdoor_air() + breeze()
    impacts = track(bangs() + twangs() + rattles())
    return (bed + rolling() + impacts + natural_amplitude(DRIVE_DB) * drive())[None]


def roll_off(x):
    return signal.sosfilt(signal.butter(12, 16610, fs=SR, output="sos"), x)


def record(dry):
    overloaded = np.tanh(dry / 1.9) * 1.19
    kept = signal.sosfilt(signal.butter(4, 8600, fs=SR, output="sos"), overloaded)
    sampled = kept * (1 + 2 * np.cos(2 * np.pi * HOLD_HZ * np.arange(N) / SR))
    size = next_fast_len(N)
    hz = np.arange(size // 2 + 1) * SR / size
    lift = natural_amplitude(3.06 * np.exp(-((hz - 10500) / 2500) ** 2))
    top = natural_amplitude(-np.clip((hz - 15380) / 4.0, 0, 22) - np.clip((hz - 15600) / 14.0, 0, 30))
    response = np.sinc(hz / HOLD_HZ) * lift * top
    mix = irfft(rfft(sampled, size) * response, size)[:, :N]
    return roll_off(mix)


dry = scene()
out = record(dry)
master_out(out)
```